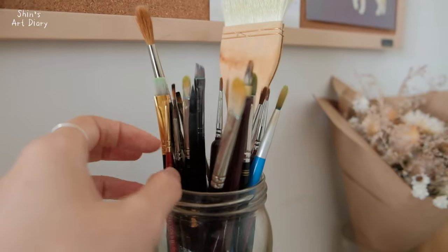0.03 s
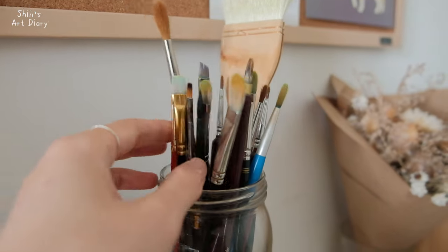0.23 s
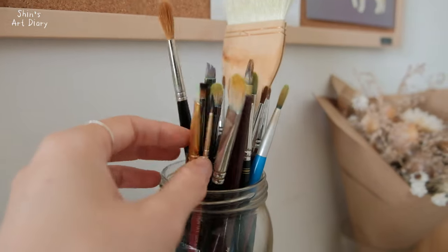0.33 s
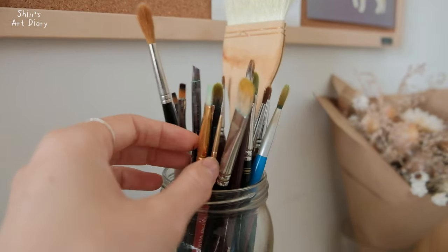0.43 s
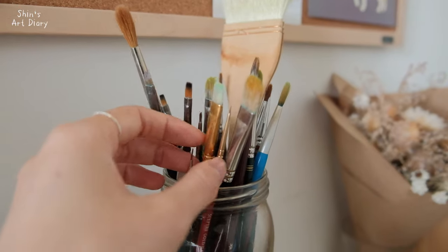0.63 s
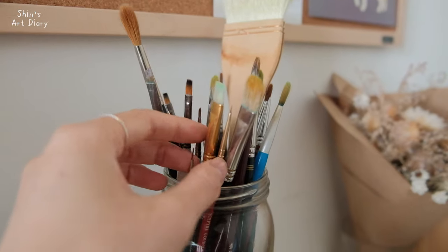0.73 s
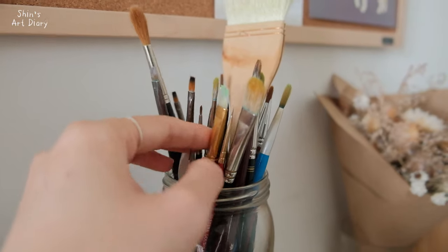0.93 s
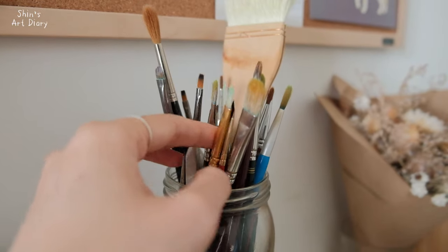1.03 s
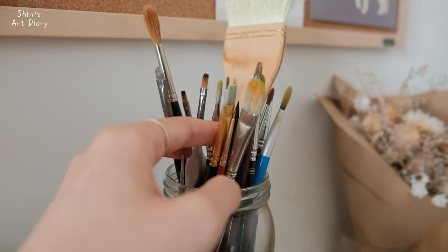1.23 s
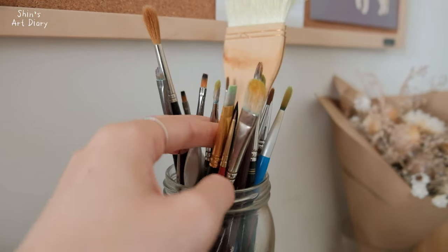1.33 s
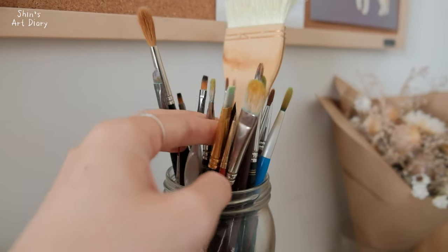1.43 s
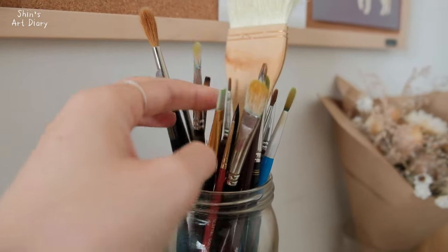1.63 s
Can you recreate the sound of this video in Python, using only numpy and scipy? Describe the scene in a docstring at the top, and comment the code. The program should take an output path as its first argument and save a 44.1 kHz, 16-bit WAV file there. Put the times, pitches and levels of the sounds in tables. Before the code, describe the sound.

Paintbrushes rattle, scrape and clink in a glass jar as a hand sorts through them.

```python
"""Paintbrushes in a glass jar

A hand sorts through brushes standing in a jar, in a small quiet room with a faint hiss.
Handles scrape and tick on each other in bursts of tiny slips; their ends drag, thud and
briefly judder on the bottom, ringing the jar's low modes. Knocks on the glass give short
clinks, damped by the leaning brushes. The moving hand adds a soft low rumble."""
import sys
import numpy as np
from scipy import signal
from scipy.fft import rfft, irfft, next_fast_len
from scipy.io import wavfile

SR = 44100
rng = np.random.default_rng(int(sys.argv[2]) if len(sys.argv) > 2 else 0)


def pcm_store(signal):
    """Save signal as 16-bit PCM."""
    levels = np.round(np.clip(np.atleast_2d(signal), -1, 1) * 32767)
    wavfile.write(sys.argv[1], SR, levels.astype(np.int16).T)


N = 74970
EVENT_SAMPLES, ATTACK_S = 8192, 0.00086
SLIP_LIKENESS = 0.25  # left-right correlation
CONTACT_PEAK_DB, CONTACT_WIDTH_HZ = 10, 57

# low modes of the loaded jar on the table: f/Hz, level/dB, t60/s
JAR_MODES = [(312.4, -10, 0.065), (398, -19.5, 0.2), (486.4, -6, 0.057), (723, 5, 0.0091),
             (995.4, -2, 0.044), (1159, -2, 0.018), (1840, 9.5, 0.0038), (1817, -7, 0.04)]
# spectrum of wood and ferrules touching: f/Hz, level/dB
CONTACT_SPECTRUM = [(700, -16.5), (1800, -1), (2850, 7), (3400, 5.5), (4100, 2.5), (6000, 3), (8500, -2.5),
                    (10500, -8), (13000, -12.5), (16000, -23)]
# resonances in each tick and scrape, the jar's glass ring (2750 Hz), then handles and ferrules: f/Hz
CONTACT_MODES_HZ = [2750, 3730, 4205, 5580, 6630, 7690, 8420, 9640, 11340, 12500]


def from_db(db):
    """Decibels to gain."""
    return 10 ** (np.asarray(db) / 20)


def rms_one(x):
    """Scale to rms 1."""
    return x / np.sqrt(np.mean(x ** 2) + 1e-30)


def pan(left_minus_right_db):
    """Constant-power stereo gains."""
    return rms_one(from_db([[left_minus_right_db / 2], [-left_minus_right_db / 2]]))


def pair(draw, likeness):
    """Two correlated channels from two independent signals."""
    return np.sqrt(1 + likeness) * draw[0] + np.sqrt(1 - likeness) * draw[1] * np.array([[1], [-1]])


def colour(x, spectrum, extra_db=lambda hz: 0):
    """Minimum-phase filter through (f/Hz, level/dB) points."""
    size = 2 * next_fast_len(x.shape[-1])
    hz = np.maximum(np.arange(size // 2 + 1) * SR / size, 1)
    points_hz, points_db = np.transpose(spectrum)
    gain_db = np.interp(np.log(hz), np.log(points_hz), points_db) + extra_db(hz)
    cepstrum = irfft(np.log(from_db(gain_db)))
    cepstrum[1:size // 2] *= 2
    cepstrum[size // 2 + 1:] = 0
    return irfft(rfft(x, size) * np.exp(rfft(cepstrum)))[..., :x.shape[-1]]


def resonances_db(hz, peaks):
    """Lift from resonance peaks (f/Hz, height/dB, half-width/Hz)."""
    return sum(db / (1 + ((hz - centre_hz) / width_hz) ** 2) for centre_hz, db, width_hz in peaks)


def ring(force, hz, t60_s):
    """One driven, damped mode."""
    r, w = np.exp(-np.log(1000) / (t60_s * SR)), 2 * np.pi * hz / SR
    return signal.lfilter([0, np.sin(w)], [1, -2 * r * np.cos(w), r * r], force + 1e-18)


def add(out, start_s, sound):
    """Mix a sound in at start_s."""
    i = int(start_s * SR)
    out[:, i:i + sound.shape[1]] += sound[:, :max(N - i, 0)]


def hand_motion():
    """Per-sample scrape, drag and rumble gains as the hand moves."""
    # t/s, scrape/dB, drag/dB, rumble/dB
    motion = [(0, -65.5, -53, -56.5), (.04, -72, -74, -57), (0.198, -70, -61, -54.5),
              (0.241, -50, -54.5, -57), (0.28, -62, -56.5, -66), (0.317, -64, -76, -62.5),
              (0.349, -56, -59, -62), (.43, -60, -57.5, -60.5), (.465, -66.5, -60, -62),
              (0.518, -54, -66, -66.5), (0.571, -65, -63, -65), (.68, -78, -82, -70),
              (.75, -68, -68.5, -60.5), (0.829, -73, -69.5, -56.5), (.89, -63.5, -60.5, -56.5),
              (.99, -70.5, -69.5, -62), (1.15, -68.5, -65.5, -56.5), (1.27, -77.5, -70.5, -60.5),
              (1.34, -65.5, -66.5, -57.5), (1.428, -65.5, -62, -59), (1.49, -77, -77.5, -62.5),
              (1.589, -73.5, -73, -56.5), (1.7, -77.5, -75, -64.5)]
    times_s, *levels_db = np.transpose(motion)
    return [from_db(np.interp(np.arange(N) / SR, times_s, db)) for db in levels_db]


def friction(slips_per_s=1500, size_scale_db=3):
    """Two streams of dense slips of uneven size."""
    sizes = from_db(size_scale_db * np.minimum(rng.exponential(1, (2, N)), 4))
    signs = rng.choice([-1, 1], (2, N))
    return sizes * signs * (rng.random((2, N)) < slips_per_s / SR)


def scrape(gain):
    """Handles rub each other with a gritty sizzle and ring the rim when pressed hard."""
    slips = pair(friction(), SLIP_LIKENESS)
    peaks = [(hz, CONTACT_PEAK_DB, CONTACT_WIDTH_HZ) for hz in CONTACT_MODES_HZ]
    rub = rms_one(colour(slips, CONTACT_SPECTRUM, lambda hz: resonances_db(hz, peaks)))
    highpass = signal.butter(2, 10400, "high", fs=SR, output="sos")
    sharp_slips = colour(slips * np.abs(slips), CONTACT_SPECTRUM)
    grit = from_db(-12) * rms_one(signal.sosfilt(highpass, sharp_slips))
    rim = from_db(5.5) * pan(-50) * rms_one(ring(slips, hz=2926, t60_s=0.04))
    return gain * (rub + grit + rim * gain / gain.max())


def jar_body(force):
    """The jar's low modes, driven with alternating sign."""
    return sum((-1) ** k * from_db(db) * ring(force, hz, t60_s)
               for k, (hz, db, t60_s) in enumerate(JAR_MODES))


def drag(gain):
    """Handle ends slide on the bottom and drive the jar's low modes."""
    return gain * rms_one(jar_body(pair(friction(), likeness=0.93)))


def hand_rumble(gain):
    """Low handling noise, alike in both channels."""
    # f/Hz, level/dB
    spectrum = [(35, -17.5), (54, -10.5), (100, -9), (140, -1), (200, -11.5), (300, -12), (600, -21),
                (1200, -22), (3000, -76.5)]
    return gain * rms_one(colour(pair(rng.standard_normal((2, N)), likeness=1), spectrum))


def hiss(level_db=-72):
    """Still air and microphone noise."""
    spectrum = [(150, -11.5), (1500, -4), (4000, -13.5), (16000, -72)]  # f/Hz, level/dB
    noise = pair(rng.standard_normal((2, N)), likeness=0.53)
    return from_db(level_db) * rms_one(colour(noise, spectrum))


def struck(modes, lag_spread_s=20e-6):
    """Decaying modes (f/Hz, level/dB, t60/s), each with a tiny random lag per channel."""
    lags_s = lag_spread_s * rng.standard_normal((len(modes), 2, 1))
    ages_s = np.maximum(np.arange(EVENT_SAMPLES) / SR - lags_s, 0)
    out = np.zeros((2, EVENT_SAMPLES))
    for (hz, db, t60_s), t in zip(modes, ages_s):
        envelope = np.minimum(t / ATTACK_S, 1) * np.exp(-np.log(1000) * t / t60_s)
        out += from_db(db) * envelope * np.sin(2 * np.pi * hz * t)
    return out


def at_level(x, db, span_s=0.002):
    """Give a short sound the energy of db held for span_s."""
    return from_db(db) * rms_one(x) * np.sqrt(span_s * SR / x.shape[-1])


def tick(decay_s, db, tilt_db, handle_hz, slip_spread_db=8, pivot_hz=5500):
    """A dying burst of tiny slips rings one handle and, by random amounts, the glass and other brushes."""
    t = np.arange(EVENT_SAMPLES) / SR
    slips = rng.standard_normal((2, len(t))) * from_db(slip_spread_db * rng.standard_normal(len(t)))
    force = pair(slips, SLIP_LIKENESS) * np.minimum(t / ATTACK_S, 1) * np.exp(-t / decay_s)
    peaks = [(handle_hz, 11, 187)]  # f/Hz, height/dB, half-width/Hz
    for hz in CONTACT_MODES_HZ:
        treble_lift = (hz / pivot_hz) ** 0.21  # the high metal modes stand out most
        peaks.append((hz, CONTACT_PEAK_DB * rng.uniform(0.24, 1) * treble_lift, CONTACT_WIDTH_HZ))

    def tint_db(hz):
        return resonances_db(hz, peaks) + tilt_db / 2 * np.tanh(2 * np.log2(hz / pivot_hz))
    return at_level(colour(force, CONTACT_SPECTRUM, tint_db), db - 0.5)


def knock(db, max_t60_s=np.inf, spread_db=3):
    """The jar thuds with new mode strengths at each blow; a short max_t60_s leaves a dry clack."""
    modes = [(hz, mode_db + spread_db * rng.standard_normal(), min(t60_s, max_t60_s))
             for hz, mode_db, t60_s in JAR_MODES]
    return at_level(rng.choice([-1, 1]) * struck(modes), db - 3.5)


def clinks(ferrule_hz=9310):
    """Handles hit the glass; it rings briefly, damped by the brushes leaning on it."""
    # t/s, ring/dB, f/Hz, t60/s, ring pan L-R/dB, tick/dB, knock/dB, tick treble tilt/dB
    hits = [(0.0503, -50, 2812, 0.022, -24, -45, -58, 5), (0.209, -50.5, 2680, 0.038, -7, -46.5, -49, -12),
            (0.224, -38.5, 2750, 0.029, -22, -65, -67, -16), (0.2421, -43, 2774, 0.051, -15, -73, -45, 4),
            (0.4737, -38.5, 2785, 0.074, -1, -38.5, -36.5, -11),
            (0.5021, -39, 2774, 0.045, -13, -40.5, -41.5, -14),
            (0.5837, -27.5, 2732, 0.043, -10, -35, -40.5, 3), (0.6206, -43, 2750, 0.042, -5, -75, -55, 18),
            (1.058, -52, 2935, 0.021, -7, -72, -75, -5), (1.4100, -48, 2760, 0.046, -14, -46.5, -77, 6),
            (1.4281, -47, 2863, 0.017, -11, -46.5, -63, -5.5),
            (1.6550, -46.5, 2880, 0.031, 0.5, -46.5, -48, -15)]
    # f ratio, relative level/dB, t60 ratio
    glass_modes = [(1, 8, 1), (.995, -16, 3.2), (.88, -4.5, .5), (.76, -2, .22), (1.5, -11, .6),
                   (2.045, -24, 1.6), (2.43, -47, 2), (3.15, -16.5, 1.1), (4.7, -32, .6)]
    out = np.zeros((2, N))
    for start_s, ring_db, hz, t60_s, pan_db, tick_db, knock_db, tilt_db in hits:
        glass = struck([(hz * f_ratio, ring_db + db, t60_s * t60_ratio)
                        for f_ratio, db, t60_ratio in glass_modes])
        contact = tick(decay_s=0.0042, db=tick_db, tilt_db=tilt_db, handle_hz=ferrule_hz)
        clack = knock(knock_db, max_t60_s=0.0064)  # a rim blow hardly rings the low modes
        add(out, start_s, glass * pan(pan_db) + contact + clack)
    return out


def taps():
    """Handles slip, tick on each other and jolt the jar."""
    # t/s, decay/s, tick/dB, knock/dB, handle resonance/Hz, tick treble tilt/dB
    contacts = [(0.2277, 0.0028, -41.5, -46.5, 4900, -1), (0.236, 0.0095, -34.5, -69, 4700, -6),
                (0.27, 0.0046, -40.5, -49, 2820, 6.5), (0.3228, 0.0011, -48, -50.5, 4320, 1),
                (0.3356, 0.0049, -41, -80, 4970, 9), (.346, 0.0026, -45, -83, 7200, -1),
                (0.3781, 0.0042, -41, -71, 9270, 11), (.393, 0.0049, -39, -46, 2980, 1),
                (0.4203, 0.0081, -37, -39.5, 2890, 7), (0.43, 0.0022, -36, -50, 4190, 5),
                (0.5085, 0.0034, -39, -43, 5740, 3), (0.7009, 0.0062, -45.5, -53.5, 7300, -2),
                (0.754, 0.011, -47, -51.5, 6070, -4), (0.8503, 0.008, -47.5, -43.5, 3100, 0),
                (0.88, 0.0037, -39, -55, 4060, -5.5), (0.9215, 0.0015, -49, -45.5, 6160, -4),
                (0.984, 0.006, -47.5, -46, 3630, 9), (0.9891, 0.0054, -40.5, -41.5, 2890, -50),
                (1.099, 0.0024, -50.5, -54, 4320, -13), (1.1339, 0.013, -46, -50, 8840, 2),
                (1.1896, 0.0013, -40, -40, 2890, -6.5), (1.3072, 0.0035, -46.5, -48, 2600, 0.5),
                (1.3526, 0.003, -46, -49, 3930, -5)]
    out = np.zeros((2, N))
    for start_s, decay_s, tick_db, knock_db, handle_hz, tilt_db in contacts:
        add(out, start_s, tick(decay_s, tick_db, tilt_db, handle_hz) + knock(knock_db))
    return out


def judder(start_s=0.94, length_s=0.05, rate_hz=479.4, jitter=0.806, level_db=-52.5):
    """A pushed handle sticks and slips on the bottom at a nearly even rate; the jar hums briefly."""
    t = np.arange(N) / SR
    cycles = np.cumsum(rate_hz / SR * (1 + jitter * rng.standard_normal(N)))
    slips = np.diff(np.floor(np.maximum.accumulate(cycles)), prepend=0)  # one impulse per cycle
    push = np.sin(np.pi * np.clip((t - start_s) / length_s, 0, 1))
    return from_db(level_db) * jar_body(slips * push) / np.std(jar_body(slips))


def from_the_left(x, lag_s=22e-6):
    """The sound reaches the right channel slightly later."""
    hz = np.arange(N + 1) * SR / (2 * N)
    right = irfft(rfft(x[1], 2 * N) * np.exp(-2j * np.pi * hz * lag_s))[:N]
    return np.array([x[0], right])


def room(x, t60_s=0.18, delay_s=0.0042, level_db=-8.5):
    """Short diffuse reverberation, different on each side."""
    # f/Hz, level/dB
    spectrum = [(300, -23), (2800, -2.5), (5000, -1), (16000, 2)]
    t = np.arange(2 * EVENT_SAMPLES) / SR
    envelope = (t > delay_s) * np.exp(-np.log(1000) * t / t60_s)
    tail = rms_one(colour(rng.standard_normal((2, len(t))) * envelope, spectrum)) / np.sqrt(len(t))
    return from_db(level_db) * signal.fftconvolve(x, tail, axes=1)[:, :N]


def scene():
    """Brushes and jar in the room, over hiss and hand rumble."""
    scrape_gain, drag_gain, rumble_gain = hand_motion()
    jar = from_the_left(clinks() + taps() + scrape(scrape_gain) + drag(drag_gain) + judder())
    return jar + hiss() + room(jar) + hand_rumble(rumble_gain)


def record(dry):
    """Steep low-pass at 15850 Hz."""
    return signal.sosfilt(signal.ellip(12, 0.1, 80, 15850, fs=SR, output="sos"), dry)


dry = scene()
out = record(dry)
pcm_store(out)
```